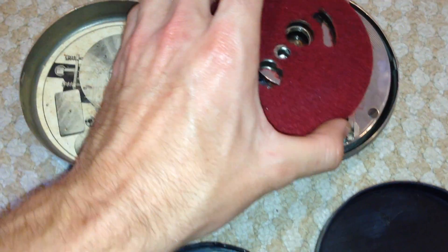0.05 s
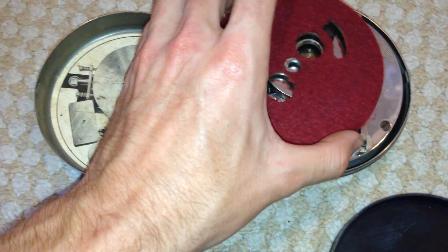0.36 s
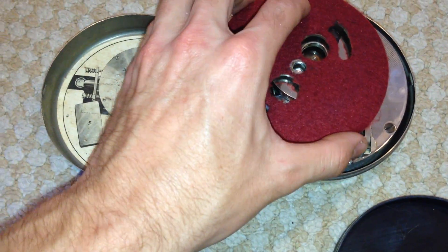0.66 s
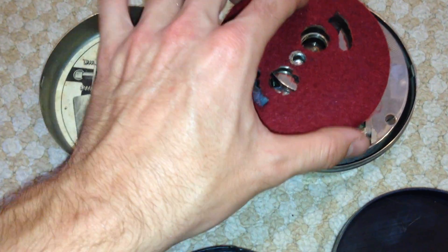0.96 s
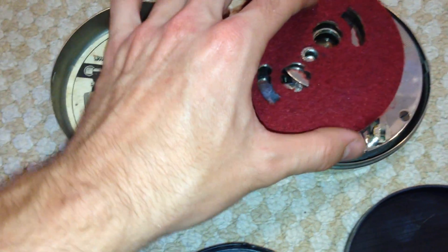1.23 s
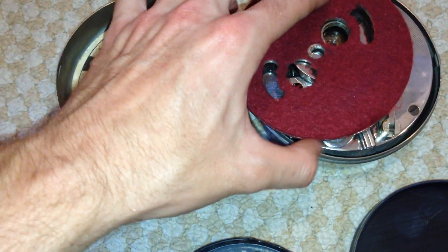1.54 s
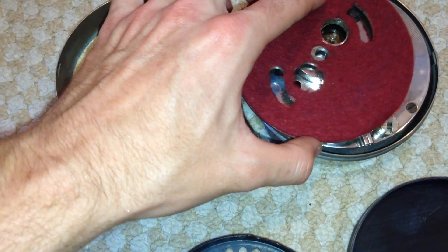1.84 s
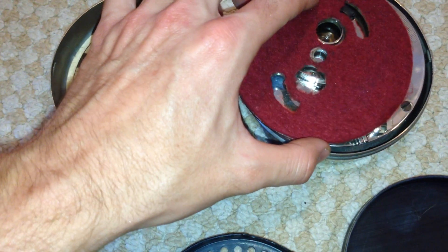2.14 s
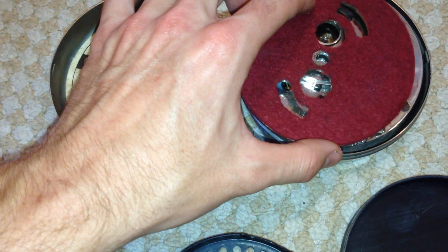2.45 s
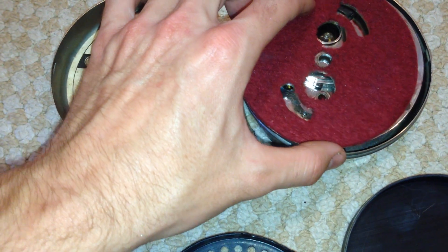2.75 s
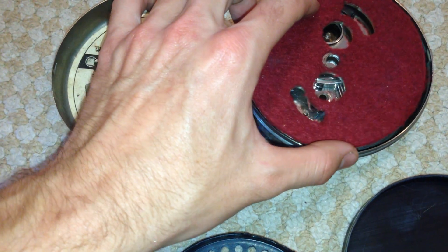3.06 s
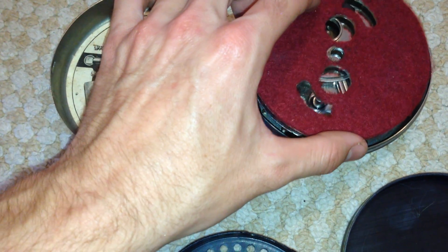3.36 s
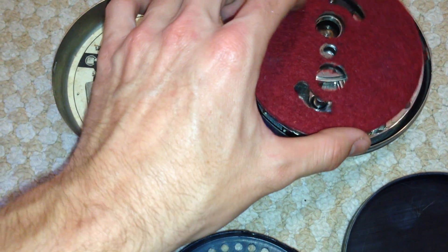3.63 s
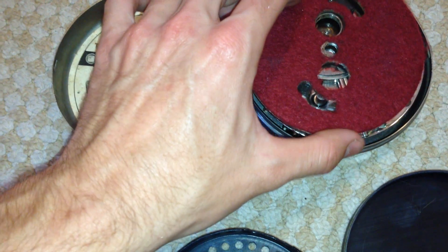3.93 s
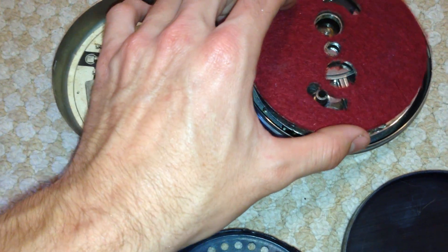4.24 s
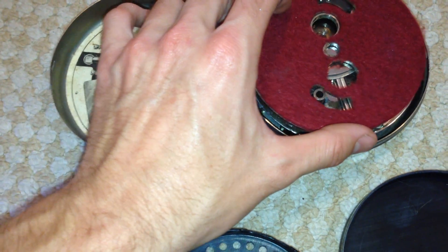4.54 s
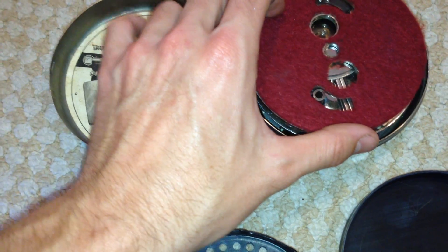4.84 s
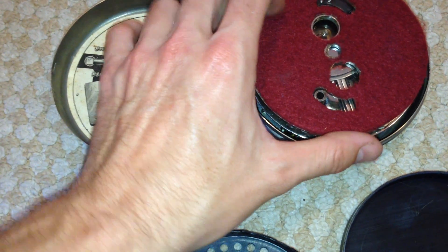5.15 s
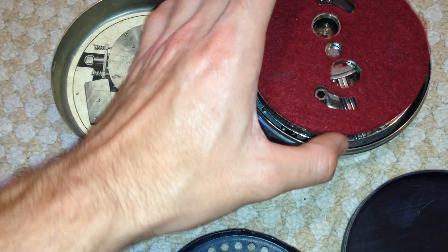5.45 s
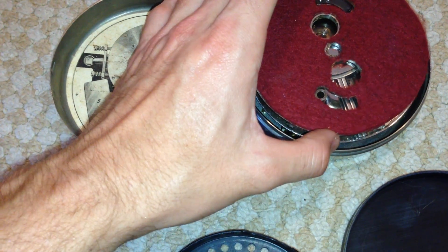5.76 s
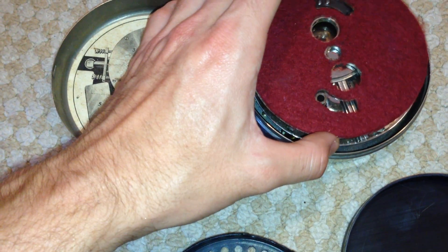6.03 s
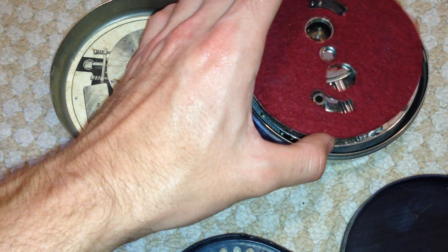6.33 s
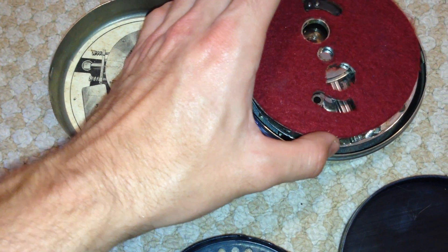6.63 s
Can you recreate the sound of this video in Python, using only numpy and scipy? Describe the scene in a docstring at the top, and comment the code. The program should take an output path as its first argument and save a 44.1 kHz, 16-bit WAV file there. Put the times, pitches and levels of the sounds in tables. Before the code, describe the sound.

A hand turns and seats a small phonograph platter in its metal case, heard close up on a padded table in a small room. A metal click and brief scrape open, followed by light ticks. At about 1.4 seconds comes a loud cluster of sharp, quickly damped clacks, then softer knocks, short scrapes and faint, thin squeaks until 2 seconds. A dull, shuddering thud comes through the table at 2.6 seconds. Around 3.5 seconds a stronger thud joins scraping and a run of clinks. Loud clacks land at 4.3 and 4.5 seconds. A softer thud follows at 5.2 seconds and a single click near 5.8. From 6 seconds the rim rubs lightly among several knocks, ending with a firm, lower clack at about 6.6 seconds. A faint appliance hum and hiss lie underneath throughout.

```python
"""In a small room, on a padded table, a hand turns and seats the felt-covered platter of a pocket
phonograph in its metal case. Metal edges knock, often bouncing once, and the hand muffles them while
the case rings low. In between, the rim scrapes in short strokes and sometimes squeaks thinly.
Three dull thuds come through the table and shudder out. An appliance hums under a faint hiss."""
import sys
import numpy as np
from scipy import signal
from scipy.fft import rfft, irfft, next_fast_len
from scipy.io import wavfile

SR = 44100
rng = np.random.default_rng(int(sys.argv[2]) if len(sys.argv) > 2 else 0)


def digitize_waveform(pressure):
    """Quantize a signal to 16-bit integers and store it at the path in sys.argv[1].

    Rows of a 2-D input are taken as channels; values are limited to [-1, 1].
    """
    field = np.atleast_2d(pressure).T
    bounded = np.clip(field, -1, 1)
    quanta = np.round(bounded * 32767).astype(np.int16)
    wavfile.write(sys.argv[1], SR, quanta)


N = 295029
T = np.arange(N) / SR
HIT_T = T[:SR // 3]  # the time span of one hit

# tones of the free metal parts, which ring on: (pitch [Hz], relative level [dB], time to fade 60 dB [s])
FREE_PARTS = [(1245, -8, .22), (1296, -11.5, .22), (1441.8, -8.5, .17), (2012, 2.5, .15), (2130, -6, 0.27),
              (2370, -9.5, .22), (3340, -2, .1), (3408.6, -9.5, 0.3), (3768, -4.5, 0.16), (4380, -6.5, .15),
              (4810, -3.5, .17), (5358, -6, .2), (5970, -5, .14), (8565, -15.5, .13)]


def undb(db):
    """Turn decibels into a gain."""
    return 10 ** (np.asarray(db) / 20)


def unit(x):
    """Scale a sound to an energy of one."""
    return x / np.sqrt(np.sum(x ** 2))


def add(track, s, sound):
    """Mix a sound into the track at s seconds."""
    start = max(int(s * SR), 0)
    track[start:start + len(sound)] += sound[:N - start]


def colour(x, points):
    """Make some pitches louder and others softer, from (pitch [Hz], level [dB]) points."""
    hz, db = np.transpose(points)
    freqs = np.maximum(np.fft.rfftfreq(len(x), 1 / SR), 1)
    gain = undb(np.interp(np.log(freqs), np.log(hz), db))
    return irfft(rfft(x) * gain, len(x))


def lowpass(x, hz, order):
    """Dull a sound by turning down everything above hz."""
    return signal.sosfilt(signal.butter(order, min(hz, SR / 2 - 1), fs=SR, output="sos"), x)


def fade(t60):
    """A struck part dies away, losing 60 dB in t60 seconds."""
    return np.exp(-np.log(1000) * HIT_T / t60)


def swell(rise_s):
    """Edges take a moment to press into each other, so the sound builds up."""
    return 1 - np.exp(-HIT_T / rise_s)


def arches(rows):
    """A gain that rises and falls once for each (start [s], length [s], level [dB]) row."""
    return sum(undb(db) * np.sin(np.pi * np.clip((T - s) / length, 0, 1)) for s, length, db in rows)


def burst(points, t60):
    """Countless close tones dying together sound like a puff of noise."""
    return unit(colour(rng.standard_normal(len(HIT_T)), points) * fade(t60))


def ring(tones, scatter_db, detune):
    """A part rings; where it is hit and how it is held change each tone's level, sign and pitch."""
    out = np.zeros(len(HIT_T))
    for (hz, db, t60), (share, side, grip) in zip(tones, rng.standard_normal((len(tones), 3))):
        t = HIT_T[:int(2 * t60 * SR)]
        swing = np.sign(side) * np.sin(2 * np.pi * hz * (1 + detune * grip) * t)
        out[:len(t)] += undb(db + scatter_db * share) * swing * np.exp(-np.log(1000) * t / t60)
    return unit(out)


def background():
    """An appliance hums over hiss and low rumble; late on, all of it dips and creeps back."""
    # tone colour of the rumble and hiss: (pitch [Hz], relative level [dB])
    air_colour = [(12, -49.5), (20, -21.5), (47, -12.5), (72, -10.5), (103, -10), (126, -10), (148, -12),
                  (324, -22.5), (667, -27), (746, -30.5), (1540, -31), (2030, -30.5), (2920, -33),
                  (13100, -37.5), (15500, -39.5)]
    # tones of the appliance: (pitch [Hz], level before the drift [dB])
    hum_tones = [(100.4, -57), (200, -78.5), (238, -77)]
    # drift of the background's loudness: (time [s], level change [dB])
    drift = [(0, 1), (4.53, 2), (4.65, -2.5), (5.6, -0.98), (6.69, 1)]
    air = colour(rng.standard_normal(next_fast_len(N)), air_colour)[:N]
    hum = sum(undb(db) * np.sqrt(2) * np.sin(2 * np.pi * (hz * T + rng.random())) for hz, db in hum_tones)
    gain = undb(np.interp(T, *np.transpose(drift)))
    return (undb(-61.5) * air / air.std() + hum) * gain


def platter(detune):
    """One touch on the platter gives a short crack and tones that the hand soon stops."""
    # tones of the held platter and frame: (pitch [Hz], width [Hz], relative level [dB])
    held_tones = [(900, 110, -7.5), (1117, 180, -5), (1450, 64, -2.5), (1560, 120, -8.5), (2012.7, 120, 2),
                  (2262, 100, 1), (2471, 87, -1), (2677, 120, 0), (3130, 100, -10.5), (3589, 130, -3.5),
                  (3983, 120, -6.5), (4535, 58, -14), (5107, 140, -4), (5726, 79, -11.5)]
    # tone colour of the crack: (pitch [Hz], relative level [dB])
    crack_colour = [(200, -28.5), (600, -10), (1200, 7), (2400, -0.5), (4000, -1.5), (5800, -10.5),
                    (6800, -10.5), (12000, -33)]
    tones = [(hz, db, np.log(1000) / (np.pi * width)) for hz, width, db in held_tones]  # wide dies fast
    return ring(tones, scatter_db=0.5, detune=detune) + undb(-3.0) * burst(crack_colour, t60=0.037)


def scrape(catches_per_s=3000):
    """The sliding rim catches on countless tiny bumps, and each catch makes the metal ring."""
    # strokes of the platter sliding on its rim: (start [s], length [s], level before the jerks [dB])
    strokes = [(-0.04, 0.179, -53.5), (1.375, .065, -47.5), (1.65, 0.159, -66.5), (1.82, 0.176, -55.5),
               (2.12, .45, -72), (3.14, 0.384, -67), (3.53, .26, -53), (4.14, 0.093, -59.5),
               (4.3, .06, -50), (4.6, 0.126, -62), (5.79, .13, -64.5), (6.01, 0.468, -66),
               (6.51, 0.1357, -56)]
    catches = (rng.random(N) < catches_per_s / SR) * rng.standard_normal(N)
    lasting = ring(FREE_PARTS, scatter_db=1, detune=0.002)
    metal = platter(detune=0.005) + undb(-10.5) * lasting
    one_catch = colour(metal, [(400, 3.0), (1200, -2), (2300, 0), (3300, -3), (5300, -2.5), (8000, -1.5)])
    rub = signal.fftconvolve(catches, one_catch)[:N]
    steps = np.linspace(0, T[-1], num=200)
    jerks = undb(2.2 * np.interp(T, steps, rng.standard_normal(len(steps))))  # the hand moves unevenly
    return rub / rub.std() * jerks * arches(strokes)


def clack(metal, lead_hz, middle_hz=2200):
    """A knock favours the pitches near one leading tone: low for a soft seat, high for a hard edge."""
    centre_hz = middle_hz * (lead_hz / middle_hz) ** 0.85  # from the platter's mid-range toward that tone
    broad = unit(signal.lfilter(*signal.iirpeak(centre_hz, Q=1.4, fs=SR), metal))
    ping = unit(np.sin(2 * np.pi * lead_hz * HIT_T) * fade(t60=0.023) * swell(rise_s=0.00094))
    return unit(broad + undb(-6.0) * ping)


def case_knock(blow_db, clink_db):
    """The case answers a blow with a low, hollow knock."""
    # tones of the case on its padding: (pitch [Hz], relative level [dB], time to fade 60 dB [s])
    case_tones = [(369.8, -2.5, 0.15), (639, -9.5, 0.078)]
    # tone colour of the dull knock: (pitch [Hz], relative level [dB])
    knock_colour = [(100, -20), (200, -10.5), (300, 4), (480, 1), (650, 1.5), (1000, -17.5), (2000, -42)]
    # the case's share is larger in light touches and smaller in soft seats with little clink
    share_db = -20.5 - 0.5172 * blow_db + 0.3 * clink_db
    body = ring(case_tones, scatter_db=4.5, detune=0.018) + burst(knock_colour, t60=0.051)
    return undb(share_db) * unit(body)


def blow(db, lead_hz, clink_db, edge_db, split_hz=3500):
    """Metal meets metal: a clack, a higher clink, a bright tick of the edge and a knock of the case."""
    # tone colour of the sharp edge: (pitch [Hz], relative level [dB])
    edge_colour = [(4000, -26), (6500, -1.5), (7500, -3), (8600, 1), (10000, -0.5), (11500, -11),
                   (13000, -4.5), (16000, -16.5)]
    metal = platter(detune=0.014) * swell(rise_s=0.0008)
    metal += undb(-18.5) * ring(FREE_PARTS, scatter_db=1.0, detune=0.008)
    low_clack = clack(lowpass(metal, split_hz, order=5), lead_hz)
    clink_band = signal.butter(3, [split_hz, 6400], "band", fs=SR, output="sos")
    clink = undb(clink_db) * unit(signal.sosfilt(clink_band, metal))
    edge = undb(edge_db) * unit(burst(edge_colour, t60=0.031) * swell(rise_s=0.00016))
    return undb(db + 13) * (low_clack + clink + edge + case_knock(db, clink_db))


def knocks(bounce_db_per_s=-1050, bounce_pitch_ratio=1.06):
    """The platter knocks against the case; where the hand holds it loosely, it bounces once."""
    # metal touching metal: (time [s], relative level [dB], leading tone [Hz], clink against clack [dB],
    # edge against clack [dB], wait until the bounce or 0 for none [s])
    contacts = [(0.0018, -16.5, 2057, -10.5, -16.5, 0), (0.2666, -39, 1401, -13.5, -27.5, 0.0055),
                (0.2913, -44, 2070, -2.5, -13, 0), (0.4996, -37, 1498, -14, -34, 0.0043),
                (0.6247, -31.5, 3629, -11.5, -34, .005), (0.8142, -47, 1966, -4.5, -31, 0.00087),
                (1.1735, -51, 2115, -14.5, -31, 0.00046), (1.293, -50, 2422, -10.5, -20, 0),
                (1.4076, -3.5, 2333, -6.5, -12.5, .004), (1.424, -9, 2514, -5.5, -18.5, .0078),
                (1.4638, -14, 2772, -11, -23, 0), (1.4816, -20.5, 2324, -6.5, -14.5, 0),
                (1.6709, -31.5, 2683, -9.5, -18.5, 0.0004), (1.797, -24, 1547, -7.5, -19.5, 0.0034),
                (1.843, -37, 1540, -10.5, -25.5, 0.002), (1.9177, -39, 2301, -4, -12.5, 0),
                (1.958, -41, 2265, -12, -21.5, 0.0024), (3.046, -50, 2400, -16, -30, 0),
                (3.4239, -25, 2471, -16, -27, .004), (3.529, -38, 3002, 0, -12, 0.0113),
                (3.555, -25, 2346, -17.5, -27.5, 0), (3.659, -29, 1978, -14, -33, 0.00012),
                (3.6676, -14, 2380, -12, -16.5, 0), (3.708, -30, 1242, -10.5, -30, 0.00265),
                (3.715, -17.5, 2286, -7.5, -13.5, 0.00078), (3.725, -20, 2668, -10, -20.5, 0),
                (3.752, -42, 3470, 9.5, -5.5, 0.00066), (3.781, -36, 2890, -13.5, -17.5, 0.00054),
                (4.204, -42, 1975, -8, -24.5, 0.00088), (4.3286, -6.5, 2640, -11, -28, .004),
                (4.339, -22.5, 1409, -7, -18.5, 0.0029), (4.4368, -38.5, 2027, -7, -23, 0.00116),
                (4.515, -28, 2005, -14, -26.5, 0.00096), (4.5286, -4.5, 2512, 0, -11.5, .0067),
                (4.539, -8, 2670, -10, -14, 0), (4.684, -40, 2535, -9, -31, 0.0007),
                (4.6992, -40, 1484, -8, -16.5, 0.00038), (5.122, -33, 1432, -5.5, -16.5, 0),
                (5.761, -19, 2740, -17.5, -26.5, 0.00032), (5.888, -45.5, 2647, -14, -22, 0.00117),
                (6.0892, -26.5, 1524, -18.5, -32.5, .004), (6.134, -32, 1205, -12.5, -28, 0.0033),
                (6.171, -30.5, 1802, -22.5, -31, 0.0076), (6.195, -14, 1106, -22.5, -32, 0),
                (6.1992, -20.5, 2155, -18, -33, 0), (6.308, -34, 2327, -40, -33, 0.001),
                (6.55, -18, 2458, -6, -20, 0.00018), (6.566, -5.5, 1364, -25.5, -33, 0),
                (6.577, -21, 2100, -24, -40, 0.0008)]
    out = np.zeros(N)
    for s, db, lead_hz, clink_db, edge_db, wait_s in contacts:
        add(out, s, blow(db, lead_hz, clink_db, edge_db))
        if wait_s > 0:
            bounce_db = db + bounce_db_per_s * wait_s  # a later bounce is weaker
            add(out, s + wait_s, blow(bounce_db, lead_hz * bounce_pitch_ratio, clink_db, edge_db))
    return out


def squeaks(pitch_hz=5230):
    """Where the rim drags, the rubbing makes it sing on one thin tone."""
    # moments of dragging: (start [s], length [s], level [dB])
    drags = [(0.01, 0.058, -70.5), (1.69, 0.0638, -67.5), (1.85, 0.118, -63.5)]
    sing = signal.lfilter(*signal.iirpeak(pitch_hz, Q=50, fs=SR), rng.standard_normal(N))
    return arches(drags) * sing / sing.std()


def thuds(bumps=6, first_gap_s=0.027, dulling_octaves_per_s=3.16):
    """Each thud booms through the padded table in bumps that spread out, weaken and grow duller."""
    # dull thuds: (time [s], strongest bump's peak [dB], time to fade 60 dB [s], upper pitch limit [Hz])
    hits = [(2.605, -26, 1.0, 240), (3.534, -20, .5, 224.7), (5.223, -30, 0.62, 252)]
    # tone colour of one bump: (pitch [Hz], relative level [dB])
    bump_colour = [(25, -40), (50, -19.5), (90, 12), (130, -0.5), (200, 1), (300, -10.5), (600, -5),
                   (1200, -7)]
    out = np.zeros(N)
    for s, db, t60, top_hz in hits:
        for k in range(bumps):
            late_s = first_gap_s * k ** 1.5
            # the first touch is a little weaker than the second; the rest die away
            size = np.exp(-np.log(1000) * (late_s - first_gap_s) / t60) if k else undb(-3)
            dulled_hz = top_hz * 2 ** (-dulling_octaves_per_s * late_s)
            boom = lowpass(burst(bump_colour, t60=0.207), dulled_hz, order=3)
            add(out, s + late_s, undb(db) * size * boom / np.abs(boom).max())
    return out


def room(x, echo_db, t60, build_s):
    """The small furnished room answers with a short wash of echoes."""
    # tone colour of the echoes: (pitch [Hz], relative level [dB])
    echo_colour = [(200, -4), (800, 5.5), (1500, 2), (2300, -1.5), (3300, 0), (4200, -3), (5300, 0.5),
                   (6800, -3.5), (9000, 1), (14000, -10)]
    tail = burst(echo_colour, t60) * np.clip(HIT_T / build_s, 0, 1) ** 2
    return x + undb(echo_db) * signal.fftconvolve(x, unit(tail))[:N]


def scene():
    """The metal with its echoes, the thuds and the background, heard close up in one channel."""
    metal = room(knocks() + scrape() + squeaks(), echo_db=-18.5, t60=0.19, build_s=0.011)
    return (metal + thuds() + background())[None]


def record(dry, top_hz=15600):
    """Cut off the very highest treble."""
    return signal.sosfilt(signal.ellip(8, 0.2, 70, top_hz, fs=SR, output="sos"), dry)


dry = scene()
out = record(dry)
digitize_waveform(out)
```